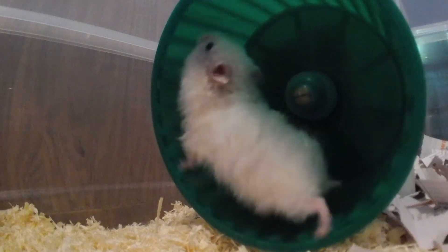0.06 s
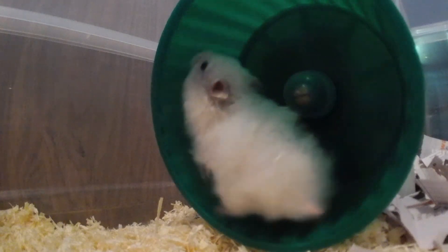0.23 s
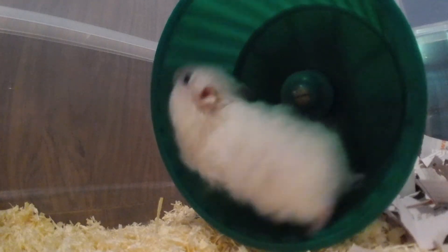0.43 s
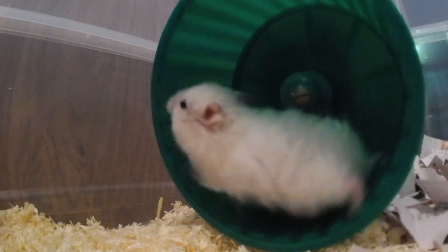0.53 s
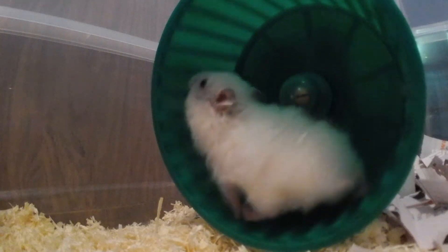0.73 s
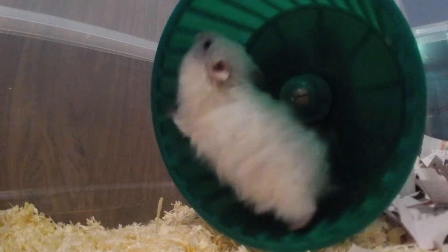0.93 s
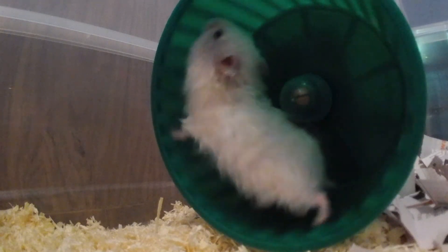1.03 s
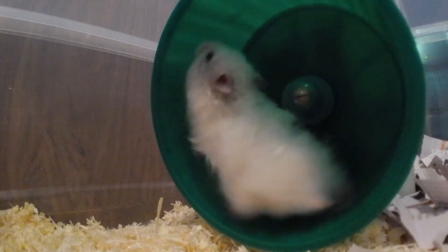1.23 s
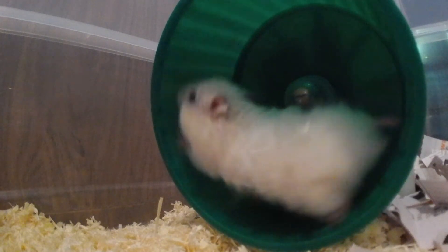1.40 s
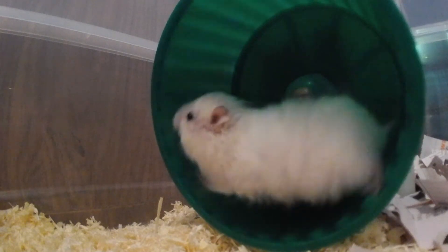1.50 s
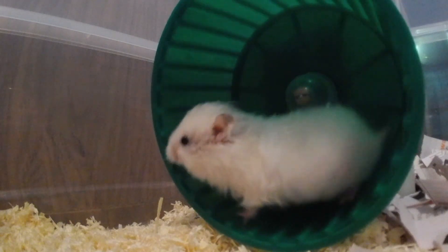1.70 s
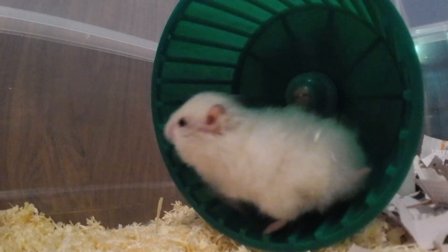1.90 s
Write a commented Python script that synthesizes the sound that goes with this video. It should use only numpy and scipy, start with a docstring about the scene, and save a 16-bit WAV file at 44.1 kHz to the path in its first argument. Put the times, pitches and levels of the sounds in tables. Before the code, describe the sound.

A plastic wheel rumbles low throughout as a hamster runs in it, close by, its paws landing in soft, uneven, booming thumps. Claws scratch faintly now and then over a soft hiss, and a dry click comes at 0.3 seconds. The heaviest jolt, around 1.4 seconds, brings two quick clicks and the hiss drops. Dull body scuffs and more thumps follow, and the rumble eases after 1.7 seconds.

```python
"""A low rolling rumble: a hamster runs in a plastic wheel in its enclosure, close to the microphone.
Its bounds thump the wheel, which booms on its stand; claws scratch faintly and its body scuffs the shell.
A soft hiss swells, then drops away at the heaviest jolt. Three dry clicks ride on the strongest swings."""
import sys
import numpy as np
from scipy import signal
from scipy.fft import rfft, irfft, next_fast_len
from scipy.io import wavfile

SR = 44100
rng = np.random.default_rng(int(sys.argv[2]) if len(sys.argv) > 2 else 0)


def inscribe(sig):
    """Save sig as 16-bit PCM at rate SR to the path in sys.argv[1].

    A 1-D sig is mono; a 2-D sig holds one channel per row.
    Samples are clipped to [-1, 1] before scaling.
    """
    pcm = np.round(np.clip(np.atleast_2d(sig).T, -1, 1) * 32767)
    wavfile.write(sys.argv[1], SR, pcm.astype(np.int16))


N = 85995
TIME = np.arange(N) / SR


def amp(db):
    """Decibels to gain."""
    return 10 ** (np.asarray(db) / 20)


def filtered(x, response):
    """x with its spectrum multiplied by a function of frequency."""
    size = next_fast_len(N + SR // 2)
    freq_hz = np.fft.rfftfreq(size, 1 / SR)
    return irfft(rfft(x, size) * response(freq_hz), size)[:N]


def noise(spectrum):
    """Noise of rms 1, coloured by rows of freq_hz, gain_db."""
    freq_hz, gain_db = np.transpose(spectrum)
    white = rng.standard_normal(N)
    coloured = filtered(white, lambda hz: amp(np.interp(np.log(hz + 1), np.log(freq_hz), gain_db)))
    return coloured / coloured.std()


def faders(rows):
    """One gain curve for each level_db column after time_s."""
    time_s, *columns = np.transpose(rows)
    return [amp(np.interp(TIME, time_s, level_db)) for level_db in columns]


def pulse(centre_s, width_s):
    """A Gaussian rise and fall; the width is its standard deviation."""
    return np.exp(-.5 * ((TIME - centre_s) / width_s) ** 2)


def friction(strokes, spectrum):
    """Brief rubs on the plastic, each a smooth swell of noise."""
    envelope = sum(amp(level_db) * pulse(centre_s, width_s) for centre_s, level_db, width_s in strokes)
    return envelope * noise(spectrum)


def rolling_wheel():
    """The turning wheel rumbles on its stand and its shell drums."""
    # Level rides of the rumble and the drumming: time_s, level_db
    rumble_levels = [(0, -22), (.18, -35.5), (.3, -27), (.5, -21), (.72, -21), (.85, -29), (1.1, -28),
                     (1.25, -22), (1.45, -29), (1.6, -20.5), (1.75, -31), (1.95, -36)]
    shell_levels = [(0, -53.5), (.2, -48), (.37, -40.5), (.5, -45.5), (.62, -41.5), (.75, -48.5),
                    (1.05, -50), (1.19, -45), (1.24, -36.5), (1.33, -44), (1.44, -29.5), (1.49, -41.5),
                    (1.58, -54), (1.618, -33.5), (1.66, -38), (1.72, -46.5), (1.86, -60), (1.95, -49)]
    # Their tone colours: freq_hz, gain_db
    rumble_spectrum = [(12, -1.5), (24, 3.5), (35, 8.5), (52, -1.5), (78, -8), (105, -17.5), (150, -38),
                       (300, -70), (900, -120)]
    shell_spectrum = [(60, -44), (110, -8), (150, 3.5), (175, -5.5), (198, -1.5), (225, -11), (290, -17),
                      (350, -25), (600, -39.5), (1500, -52), (5000, -120)]
    rumble = faders(rumble_levels)[0] * noise(rumble_spectrum)
    drumming = faders(shell_levels)[0] * noise(shell_spectrum)
    return rumble + drumming


def hiss():
    """A faint hiss, one layer dull and one bright, swells slowly and falls back abruptly."""
    # Level rides of the two layers: time_s, dull_db, bright_db
    levels = [(0, -54, -61.5), (.17, -55, -61), (.3, -52.5, -59), (.36, -50.5, -57.5), (.72, -50, -56.5),
              (1.1, -50, -57), (1.41, -49, -55.5), (1.465, -58.5, -64.5), (1.7, -58.5, -63),
              (1.95, -54.5, -62.5)]
    # Their tone colours: freq_hz, gain_db
    dull_spectrum = [(60, -28), (200, 6), (500, 0), (1000, -4.5), (2000, -9), (3200, -13), (5200, -19),
                     (8000, -53), (15000, -51)]
    bright_spectrum = [(100, -16), (500, 6), (2500, -2.5), (5200, -3), (5450, 6.5), (7900, 1.5), (8250, 5),
                       (11000, 1.5), (15500, -1.5), (15800, -59)]
    dull_gain, bright_gain = faders(levels)
    return dull_gain * noise(dull_spectrum) + bright_gain * noise(bright_spectrum)


def claw_scratches():
    """Claws graze the plastic in thin, bright strokes."""
    # Claw strokes: centre_s, level_db, width_s
    strokes = [(.036, -51.5, .004), (.051, -81, 0.003), (.826, -57, .004), (1.026, -49, .0035),
               (1.17, -61, 0.0095), (1.385, -55.5, 0.011)]
    # Colour of claw on plastic: freq_hz, gain_db
    spectrum = [(1500, -32), (2500, -4), (2950, 5), (3700, -3), (4300, -2), (5700, -1), (6300, -20),
                (12000, -37)]
    return friction(strokes, spectrum)


def footfalls():
    """Soft paws push the wheel and set it booming; shorter contacts reach its higher modes."""
    # Paw landings: centre_s, strength_db, contact_width_ms
    landings = [(0.0912, -12, 6.2), (0.2202, -14, 3.54), (0.2562, -4.5, 7.9), (0.2779, -8.5, 3.87),
                (0.307, -6.5, 6.1), (.355, -12.5, 3.2), (0.452, -6.5, 6.3), (0.504, -13, 4.6),
                (0.5462, -12.5, 6.1), (0.5969, -15, 2.4), (0.6124, -10.5, 3.7), (0.641, -9.5, 5.3),
                (0.6705, -13.5, 5.8), (0.7025, -13.5, 3), (0.7444, -18, 3.9), (0.886, -4.5, 7.2),
                (1.0792, -5.5, 8.3), (1.1979, -3, 8.1), (1.2432, -4.5, 7.8), (1.2726, -27, 2.3),
                (1.2866, -19, 1.44), (1.3, -26.5, 2), (1.3099, -17, 2.1), (1.383, -14, 4.3),
                (1.4136, 0.5, 8.7), (1.4337, -7.5, 1.7), (1.4479, -5, 1.87), (1.5147, -15.5, 4.1),
                (1.5403, -9.5, 4.25), (1.566, -14.5, 3.4), (1.612, -16.5, 1.53), (1.6279, -13, 2.35),
                (1.6583, -7.5, 7.7), (1.6827, -8.4, 3.53)]
    # Modes of the wheel on its stand: pitch_hz, gain_db, t60_s
    modes = [(37.09, 0, .45), (55.3, .5, 0.16), (78, 5, 0.087), (147.5, -5.5, 0.093), (195, -10.5, 0.091)]
    force = np.zeros(N)
    for centre_s, strength_db, contact_width_ms in landings:
        push = pulse(centre_s, contact_width_ms / 1000)
        force += amp(strength_db) * push / push.sum()
    ring = np.zeros(N)
    for pitch_hz, gain_db, t60_s in modes:
        ring += amp(gain_db - 60 * TIME / t60_s) * np.sin(2 * np.pi * pitch_hz * TIME)
    boom = signal.fftconvolve(force, ring)[:N]
    low_cut_hz = 25.5  # the slowest motion is not heard
    return signal.lfilter(*signal.butter(1, low_cut_hz, "high", fs=SR), boom)


def body_scuffs():
    """The body brushes the wheel in soft, dull strokes."""
    # Brushes against the wheel: centre_s, level_db, width_s
    strokes = [(.28, -51.5, .012), (.417, -48, 0.0072), (1.495, -43, 0.0047), (1.641, -37.5, 0.0074)]
    # Colour of body on plastic: freq_hz, gain_db
    spectrum = [(60, -20), (150, -3.5), (250, -1), (340, -16), (450, -15), (800, -26), (2000, -77),
                (6000, -120)]
    return friction(strokes, spectrum)


def dry_clicks():
    """Each click is a sudden step that relaxes, with a bright edge and no ring."""
    # Click onsets: start_s, step_db
    clicks = [(0.3249, -23), (1.4377, -15), (1.4524, -15.5)]
    step_decay_s = 0.0028
    edge_db, edge_hz, edge_decay_s = 3, 8600, .00006
    step = np.exp(-TIME / step_decay_s)
    edge = amp(edge_db) * np.exp(-TIME / edge_decay_s) * np.cos(2 * np.pi * edge_hz * TIME)
    impulses = np.zeros(N)
    for start_s, step_db in clicks:
        impulses[round(start_s * SR)] = -amp(step_db)
    return signal.fftconvolve(impulses, step + edge)[:N]


def scene():
    """Hamster and wheel in the enclosure, at one close microphone."""
    mix = footfalls() + rolling_wheel() + claw_scratches() + body_scuffs() + hiss() + dry_clicks()
    return mix[None]


def record(dry):
    """The mono recorder rolls off smoothly and keeps nothing above its band limit."""
    top_hz, taper_hz = 16700, 1200

    def roll_off(hz):
        return np.sin(np.pi / 2 * np.clip((top_hz - hz) / taper_hz, 0, 1)) ** 2

    return filtered(dry[0], roll_off)[None]


dry = scene()
out = record(dry)
inscribe(out)
```